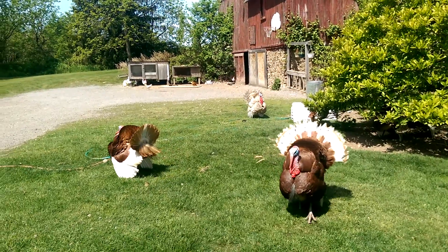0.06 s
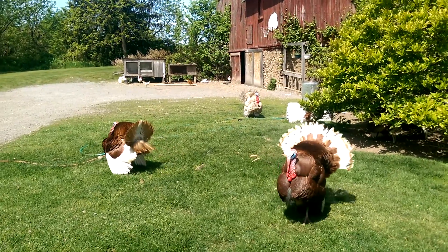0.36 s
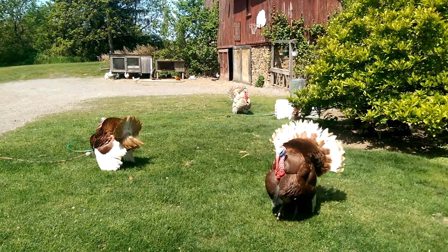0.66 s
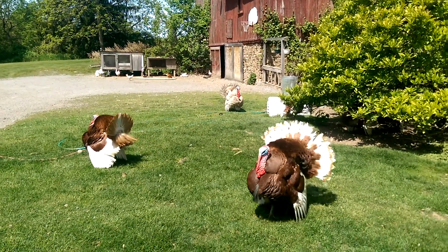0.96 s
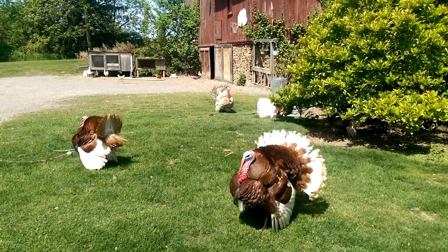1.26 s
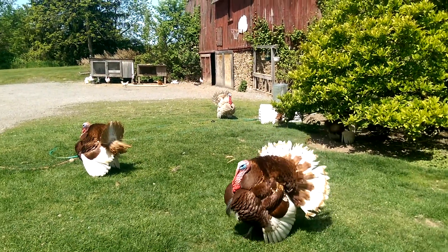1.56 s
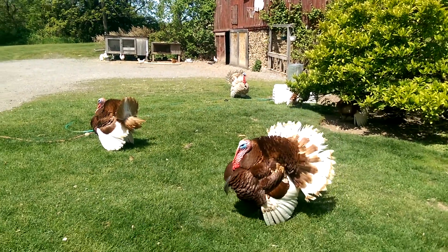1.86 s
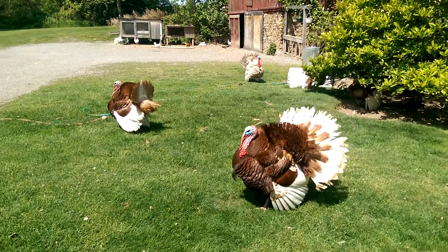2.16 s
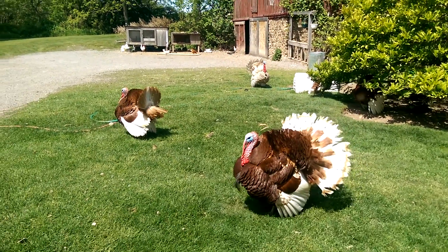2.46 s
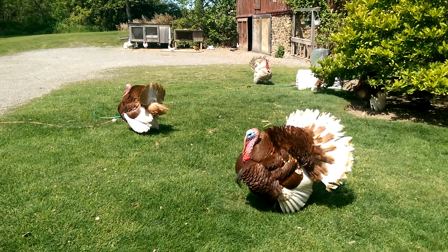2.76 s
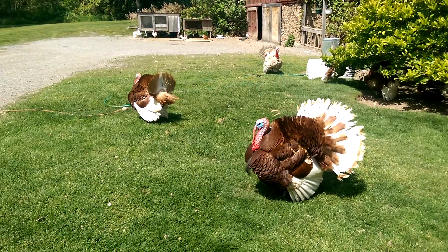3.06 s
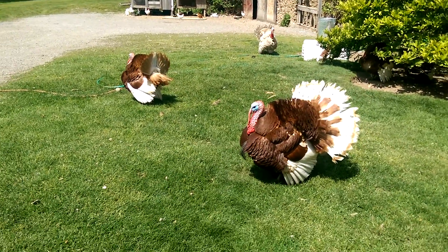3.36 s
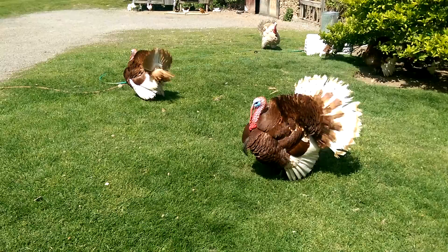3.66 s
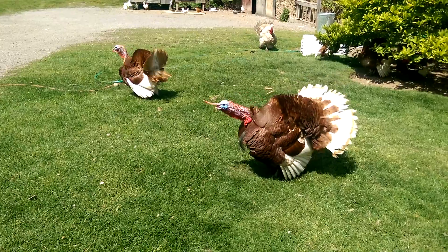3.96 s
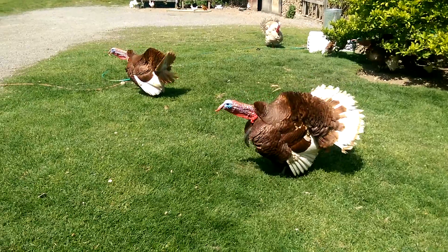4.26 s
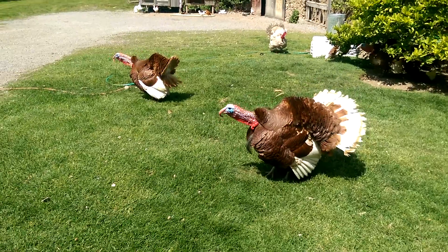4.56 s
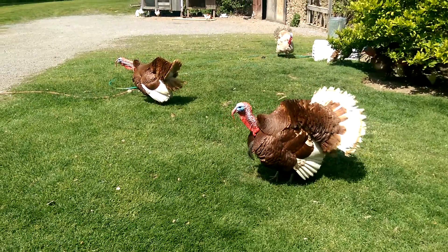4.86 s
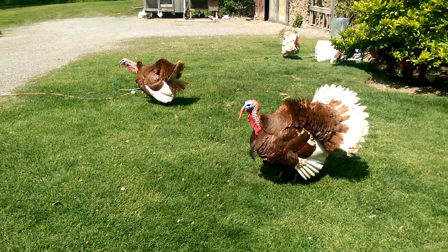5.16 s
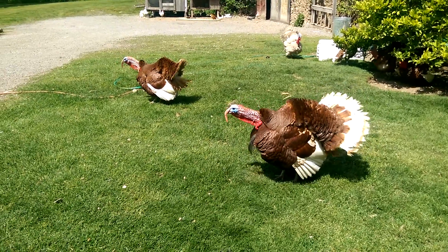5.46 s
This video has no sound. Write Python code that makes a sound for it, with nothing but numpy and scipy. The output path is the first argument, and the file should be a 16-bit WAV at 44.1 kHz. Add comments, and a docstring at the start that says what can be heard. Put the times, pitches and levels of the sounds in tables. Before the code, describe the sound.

Soft rustles of steps and feathers and a few sharp ticks sound over a faint outdoor rumble. Then two turkeys in front burst into rapid, warbling gobbles, a longer one followed by a short one, while a third yelps six times near the microphone on the right. A distant songbird chirps twice, barely audible, as the calls begin. Light puffs of wind pass through the open farmyard.

```python
"""Turkeys on a farm lawn

After some ticks and rustles over a faint rumble, two male turkeys gobble together: brassy rising hoots
tumble into falling gulps and rasps. A third, close on the right, adds six shrill yelps that break into
a rattle. Each voice is a beating membrane shaped by the throat. A far songbird chirps twice, barn and
trees give a weak echo, and light wind touches the microphone."""
import sys
import numpy as np
from scipy import signal
from scipy.fft import rfft, irfft, next_fast_len
from scipy.io import wavfile
from scipy.ndimage import uniform_filter1d

SR = 44100
rng = np.random.default_rng(int(sys.argv[2]) if len(sys.argv) > 2 else 0)


def dump(signal):
    """Clip the signal to [-1, 1] and save it as 16-bit WAV at the path in sys.argv[1]."""
    limited = np.clip(np.atleast_2d(signal).T, -1, 1)
    pcm = np.round(limited * 32767).astype(np.int16)
    wavfile.write(sys.argv[1], SR, pcm)


N = 251370
T = np.arange(N) / SR
TOP_HZ = 16000

# Levels in a table compare its rows; the overall loudness is set later.
# Tone of the yard air, the wind and the rustling: frequency_hz, gain_db
AIR_TONE = [(15, -56), (25, -25), (42, -14), (66, 1), (82, -27), (108, -15), (344, -21.5), (476, -21),
            (754, -23.5), (1790, -28.5), (2480, -27), (3080, -36.5), (10400, -49.5), (16000, -39)]
WIND_TONE = [(20, -6), (45, -12), (80, 1.5), (140, -1.5), (300, -15.5), (700, -32), (2000, -68)]
RUSTLE_TONE = [(500, -6.5), (1500, -2.5), (2600, 1), (4000, -0.5), (7000, -6), (11000, -10), (15000, -13.5)]
# The low rumble over time: time_s, level_db
RUMBLE_LEVELS = [(0, -58), (.9, -56), (1.2, -47.5), (1.9, -54.5), (2.2, -60), (2.6, -54), (3.2, -50),
                 (3.7, -78.5), (3.85, -49), (4.4, -47), (5.7, -47.5)]
# Puffs of wind: loudest_s, fade_s, level_db
WIND_PUFFS = [(1.25, 0.54, -50.5), (1.748, 0.026, -47), (3.0, .15, -58), (4.798, 0.052, -36.5),
              (5.192, 0.057, -36), (5.65, 0.11, -55)]
# Steps and feathers brushing the grass: loudest_s, fade_s, level_db, left_minus_right_db
GRASS_BRUSHES = [(1.160, 0.023, -39, 0), (1.35, 0.058, -52.5, -7), (1.609, 0.019, -59.5, -7),
                 (1.72, 0.067, -60.5, -14), (3.251, 0.013, -48.5, 13), (3.33, 0.021, -56, 4)]
# A far songbird: start_s, length_s, pitch_hz, rise_share, level_db
# (a share is a part of the pitch: 0.1 is a tenth, and a negative rise is a fall)
SONGBIRD_CHIRPS = [(3.472, 0.046, 4300, .14, -64), (3.707, .065, 4500, -0.156, -59.5)]
# Short dry ticks, and a throat pop just before the first yelp:
# start_s, level_db, ring_hz, fade_s (time to fall by 60 dB)
TICKS_AND_POP = [(.108, -38, 3120, 0.034), (.136, -30.5, 2340, 0.0053), (.522, -46, 5230, .02),
                 (1.133, -35, 2420, 0.029), (1.366, -41, 2720, 0.014), (1.935, -45, 1920, 0.058),
                 (1.993, -22.5, 1920, 0.041), (2.037, -31.5, 2120, 0.072), (2.262, -36, 1180, 0.052),
                 (2.949, -38, 2280, 0.01), (2.966, -37, 2600, 0.024), (3.452, -38, 4800, 0.0045),
                 (3.5066, -19, 3430, 0.023)]
# How the throat shapes yelps, hoots and gulps, and rasps: frequency_hz, gain_db
YELP_TONE = [(500, -50), (950, -13), (1250, -16.5), (1550, -13), (1850, 1.5), (2150, 5.5), (2500, -3),
             (2800, -8.5), (3200, -9.5), (3800, -9), (4500, -25), (6900, -39.5), (8300, -26.5),
             (11500, -39.5), (15500, -40.5)]
CHEST_TONE = [(330, -29), (540, 8.5), (720, 6.5), (900, -9), (1200, 4), (1450, -7), (1700, 1.5), (2100, -5),
              (2900, -9), (4000, -21), (7000, -34), (10000, -35.5), (15000, -46)]
RASP_TONE = [(600, -21), (1000, 16.5), (1500, 10), (2050, 3), (2550, -5), (3500, -8.5), (5000, -30),
             (10000, -34.5), (15000, -41)]
# Shrill yelps: start_s, length_s, opening_hz, middle_hz, closing_hz, level_db, rattle_start_s,
# rattle_amount (0 to 1)
YELP_CALLS = [ (3.525, .093, 939, 904, 997, -14, 3.7, 0.17),
              (3.840, 0.16, 901.7, 1063, 871, -13, 3.91, 0.7),
              (4.198, 0.08, 965, 872, 1080, -13, 4.264, .6),
              (4.540, 0.15, 920.6, 1016, 1022, -13.5, 4.657, 0.88),
              (4.938, .172, 1004, 936, 1202, -14, 4.972, .55),
              (5.349, .160, 926.3, 970.5, 1175, -15.5, 5.4, 0.68)]
# Brassy hoots: start_s, length_s, pitch_hz, rise_share, droop_share, level_db, overtones_db
HOOT_NOTES = [ (3.796, 0.043, 630, -0.0089, 0.21, -14, 14.5), (3.862, .056, 686, 0.28, .08, -16.5, 15.5),
              (3.902, .034, 738, 0.038, 0.015, -14.5, 1), (4.045, 0.085, 618, 0.093, -0.11, -9, 0.5),
              (4.105, 0.05, 718.5, .12, .04, -13.5, 12), (4.152, .046, 827, -0.0051, 0.22, -14.5, 2.5),
              (4.176, 0.04, 627, 0.21, 0.008, -21.5, 23), (4.389, 0.04, 667.4, .18, 0.056, -17, 12.5),
              (4.425, 0.063, 702, .16, .12, -18.5, 13.5), (5.274, .034, 614, .22, 0, -12.5, 14),
              (5.292, 0.059, 744.4, 0.176, -0.00056, -12, -1.5),
              (5.492, 0.047, 606, 0.22, -0.052, -10.5, -0.5), (5.518, .042, 718.5, 0.13, 0.07, -15, 7.5),
              (5.567, 0.048, 748, 0.097, 0.057, -21, 3.5), (5.652, 0.072, 699, .27, 0.095, -19.5, 7)]
# Falling gulps: start_s, pitch_hz, rise_share, level_db, overtones_db
GULP_NOTES = [ (3.925, 637, -0.33, -21.5, -1), (3.989, 610, -0.34, -24, 1), (4.131, 618, -0.34, -16, 2),
              (4.250, 637, -0.32, -26.5, 8), (4.335, 600, -0.28, -17, -1), (4.409, 590.5, -0.32, -16, 3.5),
              (4.459, 586, -0.23, -17.5, 5), (4.556, 611, -0.18, -29, -9), (4.629, 579, -0.28, -30, 1),
              (4.739, 588, -.08, -28, 4), (4.784, 552, -0.2, -33, 2), (4.889, 632, -0.12, -29, 11),
              (5.169, 580, -0.182, -29.5, 3), (5.328, 718, -0.46, -13, -4), (5.401, 608, -0.5, -24.5, 3),
              (5.460, 630, -0.33, -18.5, 0.5), (5.553, 601, -0.37, -16.5, -1),
              (5.617, 615, -.25, -15, -6.5)]
# Forced rasps: start_s, length_s, pitch_hz, level_db, roughness (0 is smooth)
RASP_NOTES = [ (3.971, 0.031, 1508, -13.5, .2), (4.041, 0.036, 1296, -16, 0.83),
              (4.108, .052, 1313, -18.5, 0.66), (4.155, 0.058, 1217, -21.5, 1.2),
              (4.313, 0.032, 1170, -21, 0.8), (4.356, 0.042, 1091, -22.5, 0.47),
              (4.389, 0.047, 1139, -20, 0.55), (4.452, 0.024, 1081, -15, 0), (4.519, 0.033, 1074, -25, 0.8),
              (4.703, 0.063, 1050, -29, 1.2), (4.768, 0.047, 1068, -24.5, 0.86),
              (5.213, 0.039, 1024, -26.5, 0.37), (5.548, 0.046, 1446, -15.5, 0.52),
              (5.611, 0.046, 1136, -20.5, 1.15), (5.642, 0.037, 1348, -19, 0.8),
              (5.652, 0.066, 1110, -20, 1.17)]


def undb(db):
    """Turn decibels into a gain to multiply by."""
    return 10 ** (np.asarray(db) / 20)


def unit(x):
    """Scale a sound to an average power of 1."""
    return x / np.sqrt(np.mean(x ** 2) + 1e-18)


def colour(x, tone):
    """Make each frequency louder or softer, following a tone table."""
    size = next_fast_len(x.shape[-1] + 512)
    hz, db = np.transpose(tone)
    all_hz = np.arange(size // 2 + 1) * SR / size
    gain = undb(np.interp(np.log(all_hz + 1), np.log(hz), db))
    return irfft(rfft(x, size) * gain, size)[..., :x.shape[-1]]


def band(x, low_hz, high_hz):
    """Keep the sound between two frequencies."""
    return signal.sosfilt(signal.butter(2, [low_hz, high_hz], "band", fs=SR, output="sos"), x)


def wobble(t, rate_hz):
    """Random motion up to the given rate, about 1 in size."""
    smoothing = signal.butter(2, rate_hz, fs=SR, output="sos")
    return unit(signal.sosfilt(smoothing, rng.standard_normal(len(t) + 2048))[2048:])


def sides(pan_db):
    """Left and right gains; a positive pan is louder on the left."""
    return undb(np.array([[pan_db], [-pan_db]]) / 2)


def place(x, pan_db, left_lead_ms):
    """Give a sound a direction: it reaches one side louder and sooner."""
    shift = left_lead_ms * SR / 1000 / 2
    earlier = np.exp(2j * np.pi * np.arange(N // 2 + 1) / N * shift)
    pair = irfft(rfft(x) * np.array([earlier, 1 / earlier]), N)
    return sides(pan_db) / sides(pan_db).mean() * pair


def add(track, start_s, x):
    """Mix a short sound into a track."""
    i = int(start_s * SR)
    track[..., i:i + x.shape[-1]] += x[..., :max(N - i, 0)]


def stereo_noise(shared):
    """Left and right noise; the more is shared, the more alike they are."""
    return shared * rng.standard_normal(N) + rng.standard_normal((2, N))


def surge(loudest_s, fade_s, rise_share):
    """A gain that grows and dies away; growing takes a share of the fade time."""
    return np.exp(-np.abs(T - loudest_s) / np.where(T < loudest_s, rise_share * fade_s, fade_s))


def note_shape(length_s, hz, rise, droop, peak):
    """Time, pitch and gain of a gliding note, loudest at the share 'peak' of its length."""
    t = np.arange(0, length_s, 1 / SR)
    position = 2 * t / length_s - 1
    swell = np.sin(np.pi / 2 * np.interp(t / length_s, [0, peak, 1], [0, 1, 0]))
    return t, hz * (1 + rise * position / 2 - droop * position ** 2), swell ** 1.05


def yard_air():
    """A steady hush over a low rumble that comes and goes."""
    hush = unit(band(colour(stereo_noise(0.75), AIR_TONE), 163, TOP_HZ))
    rumble = unit(band(stereo_noise(2.7), 54.6, 82.8))
    return hush * undb(-56) + rumble * undb(np.interp(T, *np.transpose(RUMBLE_LEVELS)))


def wind():
    """Low puffs buffet each side of the microphone unevenly."""
    buffets_db = 4 * np.array([wobble(T, 16), wobble(T, 16)])
    puffs = sum(undb(db) * surge(at, fade, rise_share=.8) for at, fade, db in WIND_PUFFS)
    return unit(colour(stereo_noise(0.51), WIND_TONE)) * puffs * undb(buffets_db) * sides(pan_db=5)


def grass():
    """Grass stirs all the time, and rustles when steps and feathers brush it."""
    brushes = sum(undb(db) * surge(at, fade, rise_share=0.53) * sides(pan_db)
                  for at, fade, db, pan_db in GRASS_BRUSHES)
    hiss = unit(colour(stereo_noise(0.06), RUSTLE_TONE))
    return hiss * (undb(-60.5) + brushes) * undb(2.0 * wobble(T, 97.5))


def songbird():
    """Thin gliding whistles from far away."""
    out = np.zeros(N)
    for start, length, pitch_hz, rise, db in SONGBIRD_CHIRPS:
        _, hz, swell = note_shape(length, pitch_hz, rise, droop=0, peak=.5)
        add(out, start, np.sin(2 * np.pi * np.cumsum(hz) / SR) * swell * undb(db))
    return out


def ticks_and_pop():
    """Short dry ticks, and a throat pop just before the first yelp: each is a snap with a brief ring."""
    out, t = np.zeros(N), np.arange(SR // 5) / SR
    for start, db, hz, fade_s in TICKS_AND_POP:
        crack = rng.standard_normal(len(t)) * undb(-60 * t / fade_s)
        ring = band(crack, hz * .7, hz * 1.35)
        snap = band(crack, 1500, TOP_HZ) * np.exp(-t / .02)
        tick = ring + undb(-14) * snap
        add(out, start, undb(db) * tick / np.abs(tick).max())
    return out * sides(pan_db=-15)


def echo(x, fade_s, db, low_hz=450, high_hz=4500):
    """Scattered sound builds up and dies away, differently on each side."""
    t = np.arange(int(.7 * SR)) / SR
    scatter = band(rng.standard_normal((2, len(t))), low_hz, high_hz)
    tail = scatter * undb(-60 * t / fade_s) * (1 - np.exp(-t / 0.041))
    return undb(db) * signal.fftconvolve(x[None], unit(tail) / np.sqrt(len(t)), axes=1)[:, :N]


def membrane(t, hz, pitch_shake, level_shake, air, limp, overtones_db, flutter_hz, fray):
    """A bird's voice: uneven beats with a puff of air in each; 'limp' weakens every second beat."""
    phase = 2 * np.pi * np.cumsum(hz * (1 + pitch_shake * wobble(t, flutter_hz))) / SR
    overtones = np.zeros(len(t))
    for k in range(2, int(TOP_HZ / np.mean(hz))):
        # the beats keep changing shape, so high overtones waver in timing and strength
        waver = min(fray * (k - 1.5), 1.3)
        overtone = np.cos(k * phase + k ** 2 / 2 + waver * wobble(t, 135))
        overtones += overtone * (1 + .5 * waver * wobble(t, 63))
    puffs = air * (1 + np.cos(phase)) * rng.standard_normal(len(t))
    tone = np.cos(phase) + undb(overtones_db) * (overtones + puffs)
    return tone * (1 + limp * np.cos(phase / 2)) * np.exp(level_shake * wobble(t, flutter_hz))


def yelp_pitch(t, start, length, pitches):
    """The pitch starts high, settles onto a curve and flicks up at the very end."""
    flick_hz, crack_from_s, crack_to_s = 1270, 5.377, 5.403
    curve = np.polyval(np.polyfit([0, .5, 1], pitches, 2), t / length)
    hz = curve * (1 + 0.1783 * np.exp(-t / 0.00301))
    hz += (flick_hz - hz) * np.exp((t - length) / 0.00896)
    cracked = (start + t > crack_from_s) & (start + t < crack_to_s)  # the last yelp jumps up briefly
    return hz * (1 + .19 * cracked)


def yelps():
    """Shrill calls, strongest an octave above their pitch; pushed hard, the membrane rattles."""
    out = np.zeros(N)
    attack_s, release_s, break_s = 0.0017, 0.02, 0.0068
    sag_db, middle_db, rattle_db, release_db = -1.5, -2, -4, -17.5
    for start, length, *pitches, db, rattle_start, rattle_amount in YELP_CALLS:
        t = np.arange(0, length, 1 / SR)
        broken = rattle_amount * np.clip((start + t - rattle_start) / break_s, 0, 1)
        rough = np.maximum(.15 + 0.39 * np.exp(-t / 0.012), broken)  # each call also starts rough
        flaps = np.tanh(1.3 * unit(band(rng.standard_normal(len(t)), 65, 170)))
        rattle = rough ** 1.3 * flaps
        hz = yelp_pitch(t, start, length, pitches) * (1 + .1 * rattle)  # higher in the rattle's gaps
        source = membrane(t, hz, pitch_shake=0.0048 + 0.036 * rough, level_shake=0.35 * rough,
                          air=0.092 + 2.0 * rough, limp=1.05 * rough,
                          overtones_db=0, flutter_hz=613, fray=0.21)
        voice = colour(source, YELP_TONE)
        power = np.abs(uniform_filter1d(voice ** 2, int(.003 * SR)))
        voice /= np.sqrt(power + 1e-12)  # even out the level
        voice *= 1 - .55 * rattle  # then chop it
        release = np.clip(1 - (length - t) / release_s, 0, 1)
        level_db = db + sag_db * t / length + middle_db * np.sin(np.pi * t / length)
        level_db += rattle_db * broken + release_db * release
        edges = np.clip(np.minimum(t, length - t) / attack_s, 0, 1)
        add(out, start, voice * undb(level_db) * edges)
    return band(out, 880, TOP_HZ)


def rasp(length_s, pitch_hz, db, rough):
    """A high note chopped by a fast, uneven flutter; soft notes are duller."""
    t, hz, swell = note_shape(length_s, pitch_hz, rise=-0.071, droop=0.0685, peak=0.41)
    source = membrane(t, hz, pitch_shake=0.04 * rough, level_shake=0.59 * rough, air=0.034,
                      limp=0.12 * rough, overtones_db=.5 * (db + 33.5), flutter_hz=207, fray=0.54)
    return unit(colour(source, RASP_TONE)) * swell * undb(db)


def chest_note(t, hz, swell, overtones_db):
    """A nearly clean low note that turns brassy when forced."""
    source = membrane(t, hz, pitch_shake=.007, level_shake=.05, air=.25, limp=.04,
                      overtones_db=overtones_db, flutter_hz=250, fray=.2)
    return unit(colour(source, CHEST_TONE)) * swell


def gobbles():
    """Hoots climb, gulps drop with a soft rasp on top, and forced rasps cut in between."""
    out = np.zeros(N)
    for start, length, hz, rise, droop, db, overtones_db in HOOT_NOTES:
        hoot = note_shape(length, hz, rise, droop, peak=0.62)
        add(out, start, undb(db) * chest_note(*hoot, overtones_db))
    for start, hz, rise, db, overtones_db in GULP_NOTES:
        gulp = note_shape(.039, hz, rise, droop=0.0417, peak=0.41)
        add(out, start, undb(db) * chest_note(*gulp, overtones_db))
        add(out, start - 0.00198, rasp(length_s=0.055, pitch_hz=1.83 * hz, db=0.65 * db - 15, rough=.8))
    for start, *note in RASP_NOTES:
        add(out, start, rasp(*note))
    return out


def scene():
    """The gobbling birds are ahead, the yelping bird close on the right."""
    gobble, yelp = gobbles(), yelps()
    turkeys = undb(-2.5) * place(gobble, pan_db=-0.5, left_lead_ms=0.19)
    turkeys += undb(3.0) * place(yelp, pan_db=-16.5, left_lead_ms=-0.089)
    lawn = echo(gobble, fade_s=0.0059, db=-3, low_hz=2570, high_hz=13500)  # grass scatters the treble
    barn = echo(gobble, fade_s=.65, db=-27) + echo(yelp, fade_s=.75, db=-37)
    return turkeys + lawn + barn + songbird() + ticks_and_pop() + yard_air() + wind() + grass()


def record(dry):
    """Round off the loudest peaks and cut the highest treble."""
    rounded = dry / (1 + (dry / .95) ** 8) ** (1 / 8)
    return signal.sosfilt(signal.ellip(8, .2, 70, TOP_HZ, fs=SR, output="sos"), rounded)


dry = scene()
out = record(dry)
dump(out)
```